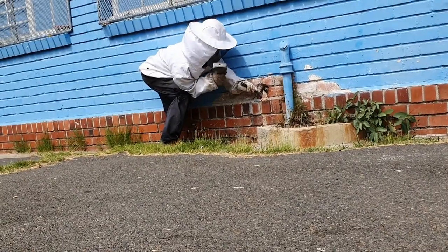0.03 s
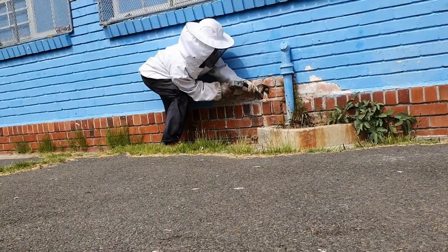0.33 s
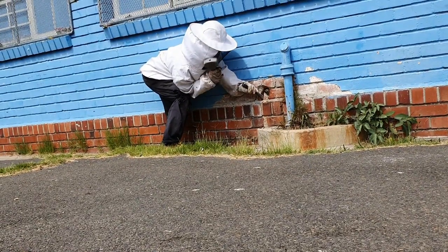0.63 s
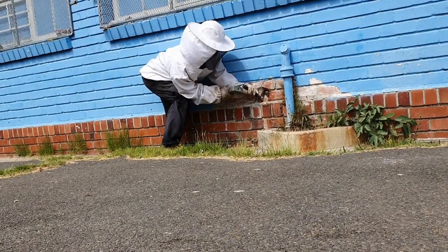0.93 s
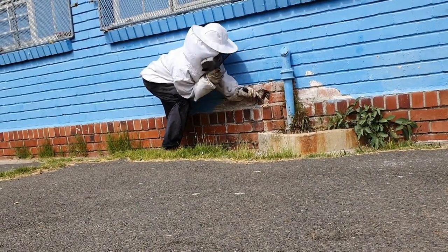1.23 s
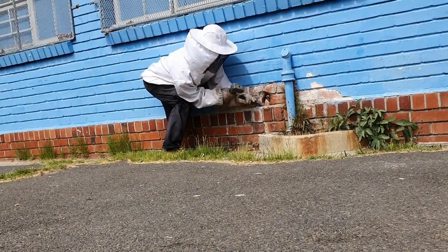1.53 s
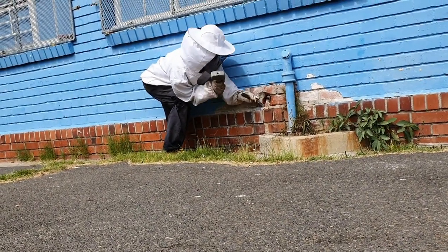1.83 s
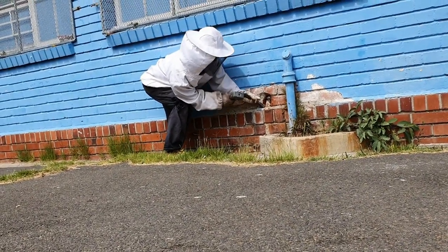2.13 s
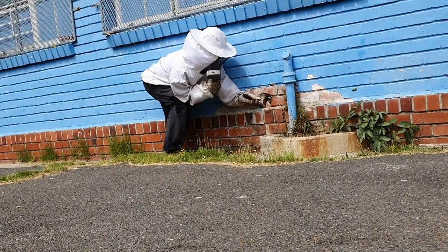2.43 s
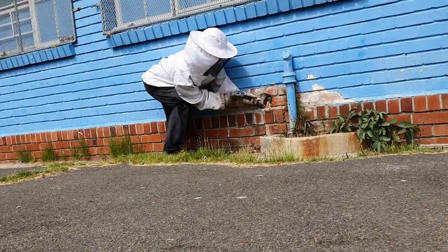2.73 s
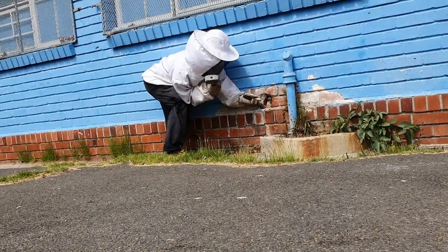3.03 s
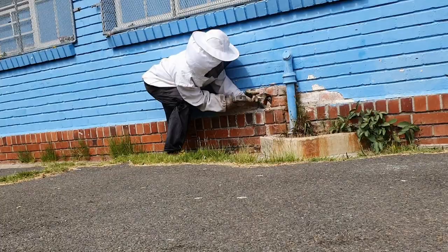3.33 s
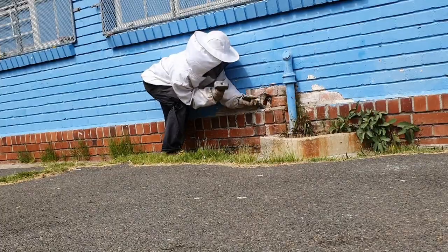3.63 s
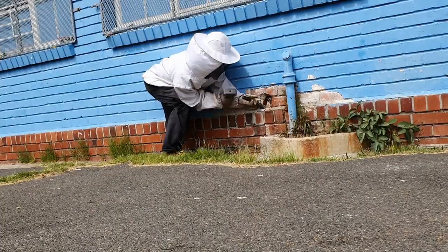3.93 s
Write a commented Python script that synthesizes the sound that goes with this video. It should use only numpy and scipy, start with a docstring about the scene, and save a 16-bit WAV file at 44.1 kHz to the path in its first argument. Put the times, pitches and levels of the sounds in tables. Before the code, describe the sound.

Chiselling on a brick wall outdoors: six sharp, clinking hammer blows echo faintly off far walls, with small ticks and falling grit between them. Wind rumbles on the microphone, growing later, over faint town air.

```python
"""Chiselling a brick wall

A club hammer drives a steel chisel into brick six times, a few metres away across a paved yard.
Each blow cracks, steel and brick ring briefly and far walls echo; the brick rings most on the third.
Between blows mortar crumbles and the chisel ticks as it is set back. Faint town air lies behind.
Wind buffets the microphone, harder towards the end."""
import sys
import numpy as np
from scipy import signal
from scipy.fft import rfft, irfft
from scipy.io import wavfile
from scipy.ndimage import uniform_filter1d

SR = 44100
rng = np.random.default_rng(int(sys.argv[2]) if len(sys.argv) > 2 else 0)


def store_wav(level_fs):
    """Save 16-bit WAV to argv[1]."""
    pcm = np.round(np.clip(np.atleast_2d(level_fs), -1, 1) * 32767)
    wavfile.write(sys.argv[1], SR, pcm.T.astype(np.int16))


N = 176400

# wind at the microphone: t/s, rumble/dB, buffeting/dB
WIND_LEVELS = [(0, -42, -53), (.3, -42, -63.5), (.55, -47, -56.5), (.85, -49.5, -56), (1.02, -39, -54.5),
               (1.2, -48.5, -67), (1.6, -50.5, -48), (1.8, -52, -60), (1.97, -47, -64), (2.16, -35, -39.5),
               (2.34, -48, -60.5), (2.62, -43, -56), (2.85, -41.5, -40.5), (2.99, -45.5, -38),
               (3.269, -43.5, -34.5), (3.542, -45.5, -28.5), (3.74, -46.5, -42.5), (4, -40, -35)]
# rumble balance, left up and right down: t/s, gain/dB
RUMBLE_BALANCE = [(0, -1), (1.1, 3.5), (2.1, 7), (2.7, 2), (3.2, 13.5), (4, 7)]
# spectra of wind, town air, mortar grains and ticks: f/Hz, level/dB
RUMBLE_SPECTRUM = [(10, -18), (28, -21), (58, 3), (100, 2.5), (160, -4.5), (300, -15.5), (700, -51.5),
                   (2000, -67.5)]
BUFFET_SPECTRUM = [(30, -24.5), (120, -8.5), (330, -0.5), (480, -5), (700, -16.5), (1200, -27.5),
                   (2000, -42), (6000, -59)]
AIR_SPECTRUM = [(30, 6), (100, 10), (250, 2), (500, -16.5), (800, 0.5), (1300, -9.5), (2500, -7.5),
                (4200, -10), (6000, -17.5), (8000, -26), (11000, -25.5), (13000, -31), (16000, -41)]
GRIT_SPECTRUM = [(1000, 3.5), (3500, -4), (4600, 6.5), (7000, -6), (10500, 1), (13000, -7), (16000, -0.5)]
TICK_SPECTRUM = [(100, -22), (800, 4), (2000, -8), (4000, -9), (7000, -19), (10500, -25), (12500, -27),
                 (15500, -6.5)]
# single eddies: t/s, length/s, level/dB, centre f/Hz
WIND_EDDIES = [(2.14, .06, -34, 107), (2.89, 0.027, -37, 115), (3.062, 0.029, -32.5, 353),
               (3.104, 0.0079, -26, 426), (3.588, 0.027, -27, 97), (3.858, 0.031, -27, 330)]
# crumbling mortar: t/s, length/s, level/dB
MORTAR_CRUMBLES = [(0.109, 0.27, -51), (0.729, 0.082, -53.5), (1.362, 0.32, -57)]
# chisel set back, grit falling: t/s, level/dB, decay/s, ring/dB
CHISEL_TICKS = [(0.2653, -20.5, 0.0017, -52), (1.4528, -13, 0.015, -43), (1.467, -17, 0.0092, -42),
                (1.494, -14, 0.06, -44), (1.928, -39, .01, -54.5), (2.654, -20.5, 0.00092, -67),
                (3.589, -18, 0.017, -44.5)]
# blows: t/s, hit gain/dB; tone: thud/dB, body/dB, bite/dB, sizzle/dB;
# gains: brick/dB, wedged chisel/dB, loose chisel/dB, scatter/dB; low, high clink: f/Hz, gain/dB each
HAMMER_BLOWS = [(0.3821, 0.5, -9, -3, 1.5, -1.5, -17.5, 10, -1, 1, 1910, 2.5, 5400, 9),
                (0.945, 4, -2, -0.5, -1, 2, 0.5, 10.5, -14, -3.5, 775, -6, 3710, -15),
                (1.5472, -2.5, -8, -10, -14, -17, 10.5, -7.5, 2.5, 3, 1596, 6, 3380, -3),
                (2.2012, -4.5, -6.5, 2.5, 4, -0.5, -9, -0.5, 5.5, 0.5, 1614, 2.5, 5850, 10.5),
                (2.8289, -2, 2.5, 4.5, 5.5, 3, -10, -4, -26, 0, 990, -28, 3510, 1),
                (3.426, 2.5, -1, 1.5, -2, -5.5, -17, -4, 5, -1.5, 1405, 1.5, 3830, -0.5)]
# modes of the brick and of the chisel, wedged and loose: f/Hz, level/dB, T60/s
BRICK_MODES = [(1408, -2, .1), (1578, 1, .11), (2160, -17, .09), (2299, -18, .11)]
WEDGED_MODES = [(3610, -19, 0.02), (3473, -6.5, 0.067), (3700, -5.5, 0.089), (4083, 5, 0.048),
                (5960, -2, 0.055), (6180, -16, .07), (12830, 0, .045), (13370, -8, 0.031)]
LOOSE_MODES = [(5760, 0.5, .08), (5796, -4.5, 0.1), (7760, -8, .06), (9880, -10.5, .07), (10480, -13, .1)]
# spectra of crack, near scatter, yard tail and echoes: f/Hz, level/dB
CRACK_SPECTRUM = [(60, -16), (200, -12.5), (480, -9), (760, 3), (1350, -2), (2050, -6.5), (2450, -1.5),
                  (2900, -7), (3600, 0), (4700, -1), (5550, -1.5), (6300, -3), (7250, -28.5), (8400, -9),
                  (9400, -19), (10500, -15), (11500, -19.5), (12300, -11.5), (13300, -33), (16000, -42.5)]
SCATTER_SPECTRUM = [(60, -4), (170, 5.5), (260, -4), (370, 4.5), (550, 0.5), (850, -0.5), (1400, -4),
                    (2000, -4), (3000, -6.5), (3900, -6.5), (4800, -12), (6000, -8.5), (7200, -18),
                    (8300, -17.5), (9500, -20.5), (11400, -21), (12400, -4), (13300, -33.5), (16000, -35.5)]
YARD_SPECTRUM = [(100, 0), (800, 3.5), (2500, 0.5), (6000, -6), (12000, -0.5)]
ECHO_SPECTRUM = [(100, -10), (1000, -12), (2800, -5), (3850, 4), (4800, -7), (6000, -0.5), (7500, -2.5),
                 (13000, 2.5)]
# decay of near scatter and yard tail: f/Hz, T60/s
SCATTER_DECAY = [(100, 0.32), (500, 0.12), (1500, 0.11), (5000, 0.13), (13000, 0.13)]
YARD_DECAY = [(100, 1.3), (1000, 1.81), (4000, 1.26), (7000, 1.5), (13000, 0.83)]
# far walls: delay/s, level/dB, smear/s
WALL_ECHOES = [(.1358, -28, .003), (.157, -33, .009), (.277, -40, .004)]
# left-right likeness of far sound and near scatter: f/Hz, correlation
FAR_COHERENCE = [(50, .5), (500, .55), (1200, 0), (3500, 0), (16000, 0.4)]
NEAR_COHERENCE = [(50, 0.74), (500, 1), (1000, 0.76), (3000, -0.1), (6000, 0.072), (10000, -.3)]
# direct sound, left against right: f/Hz, phase lead/rad
LEFT_PHASE = [(20, -1.5), (400, -1.65), (1500, 0.85), (3600, 0.49), (4500, -2.07), (7000, -2), (11000, -2),
              (16000, -3.5)]
# overall response, tilting down and falling off above 13 kHz: f/Hz, gain/dB
TREBLE_ROLLOFF = [(20, 3.5), (12600, -4), (13600, -4.5), (16000, -9.5)]

CRACK_RISE_S, CRACK_HOLD_S, CRACK_FALL_S = .001, .0027, .0019
CRACK_DB, SCATTER_DB = 13.5, 9
BRICK_DB, WEDGED_DB, LOOSE_DB, CLINK_DB = -23, -27, -30, -9
CLINK_T60_S, SCATTER_RISE_S = .018, .0025
THUD_HZ, BODY_HZ, MIDDLE_HZ, BITE_HZ, SIZZLE_HZ = 302, 820, 2760, 5600, 9500
AIR_DB, YARD_DB, RING_TO_YARD_DB = -53, -22.5, -14


def amp(db):
    """Decibels to gain."""
    return 10 ** (np.asarray(db) / 20)


def curve_at(points, hz):
    """Interpolation over log frequency."""
    f, value = np.transpose(points)
    return np.interp(np.log(hz + 1), np.log(f + 1), value)


def unit_energy(x):
    """Mean energy per channel of one."""
    return x / np.sqrt(np.mean(x ** 2) * x.shape[-1] + 1e-30)


def unit_rms(x):
    """RMS of one."""
    return x / np.sqrt(np.mean(x ** 2) + 1e-30)


def add(mix, start_s, sound):
    """Mixes a sound in, in place."""
    part = mix[:, max(round(start_s * SR), 0):][:, :sound.shape[-1]]
    part += sound[..., :part.shape[-1]]


def colour(x, spectrum, size=4096):
    """Minimum-phase filter from a curve of f/Hz, gain/dB."""
    log_gain = np.log(amp(curve_at(spectrum, abs(np.fft.fftfreq(size, 1 / SR)))))
    taps = np.fft.ifft(np.exp(np.conj(signal.hilbert(log_gain)))).real[:size // 2]
    return signal.fftconvolve(np.atleast_2d(x), taps[None], axes=1)[:, :x.shape[-1]]


def diffuse(n, coherence=FAR_COHERENCE):
    """White noise from all sides, partly alike left and right."""
    a, b = rfft(rng.standard_normal((2, n)))
    same = np.clip(curve_at(coherence, np.fft.rfftfreq(n, 1 / SR)), -.98, .98)
    mid, side = a * np.sqrt((1 + same) / 2), b * np.sqrt((1 - same) / 2)
    return irfft([mid + side, mid - side], n)


def from_wall(x):
    """Direct sound reaches the two microphone ports out of phase."""
    z = rfft(np.ravel(x), 2 * x.size)
    lead = np.exp(1j * curve_at(LEFT_PHASE, np.fft.rfftfreq(2 * x.size, 1 / SR)))
    return irfft([z * lead, z])[:, :x.size]


def turbulence(spectrum, left_db, lump_db, lump_s):
    """Independent pressure noise at each port, swelling in shared lumps."""
    lumps = unit_rms(signal.fftconvolve(rng.standard_normal(N), np.hanning(int(2 * lump_s * SR)), "same"))
    ports = colour(rng.standard_normal((2, N)), spectrum)
    return unit_rms(ports * amp(lump_db * lumps)) * amp(np.array([[1], [-1]]) * left_db)


def wind(eddy_width_oct=.53):
    """Air over the microphone: rumble, higher buffeting in gusts, single eddies."""
    times_s, rumble_db, buffet_db = np.transpose(WIND_LEVELS)
    t = np.arange(N) / SR
    left_db = np.interp(t, *np.transpose(RUMBLE_BALANCE))
    rumble = turbulence(RUMBLE_SPECTRUM, left_db, lump_db=2.3, lump_s=.03)
    buffet = turbulence(BUFFET_SPECTRUM, left_db=-.5, lump_db=2.4, lump_s=.012)
    out = rumble * amp(np.interp(t, times_s, rumble_db)) + buffet * amp(np.interp(t, times_s, buffet_db))
    hz = np.fft.rfftfreq(SR, 1 / SR)
    for start_s, length_s, db, centre_hz in WIND_EDDIES:
        band = np.exp(-.5 * (np.log2((hz + 1) / centre_hz) / eddy_width_oct) ** 2)
        n = int(length_s * SR)
        eddy = irfft(rfft(rng.standard_normal((2, SR))) * band)[:, :n] * np.hanning(n) ** .5
        add(out, start_s, amp(db) * unit_rms(eddy))
    return out


def town_air():
    """Steady, diffuse noise of a distant town."""
    return amp(AIR_DB) * unit_rms(colour(diffuse(N), AIR_SPECTRUM))


def crumble(length_s, db, spread_db=4):
    """A swell of tiny mortar grains."""
    n = int(length_s * SR)
    grains = rng.standard_normal(n) * amp(spread_db * np.minimum(rng.exponential(1, n), 6))
    return amp(db) * from_wall(unit_rms(colour(grains, GRIT_SPECTRUM)) * np.hanning(n) ** .5)


def ring(modes, t):
    """Damped modes of alternating sign, set off by one touch."""
    return sum(amp(db - 60 * t / t60_s) * np.sin(2 * np.pi * hz * t) * (-1) ** k
               for k, (hz, db, t60_s) in enumerate(modes))


def tick(db, decay_s, ring_db):
    """Steel or grit touches brick; the loose chisel rings faintly."""
    t = np.arange(SR // 5) / SR
    touch = unit_energy(colour(rng.standard_normal(len(t)) * np.exp(-t / decay_s), TICK_SPECTRUM))
    return from_wall(amp(db) * touch + amp(ring_db) * ring(LOOSE_MODES, t))


def crack(t, passes=3):
    """Brick crushed under the edge: a broadband burst of a few milliseconds."""
    envelope = np.minimum(t / CRACK_RISE_S, 1) * np.exp(-np.maximum(t - CRACK_HOLD_S, 0) / CRACK_FALL_S)
    burst = rng.standard_normal(len(t)) * envelope
    for _ in range(passes):  # flatten the spectrum, keep the burst short
        z = rfft(burst)
        burst = irfft(z / np.sqrt(abs(z) + 1e-9), len(t)) * envelope ** (1 / passes)
    return unit_energy(colour(burst, CRACK_SPECTRUM))


def tail(n, decay, coherence, patchy_db=2, size=256):
    """Dense reflections: patchy diffuse noise, each band dying at its own rate."""
    hz, t, z = signal.stft(diffuse(n, coherence), SR, nperseg=size)
    patches = uniform_filter1d(rng.standard_normal(z.shape[1:]), size=3, axis=0)
    patches = unit_rms(uniform_filter1d(patches, size=6, axis=1))
    gain = amp(patchy_db * patches) * np.exp(-np.log(1000) * t / curve_at(decay, hz)[:, None])
    return signal.istft(z * gain, SR, nperseg=size)[1][:, :n]


def scatter(t):
    """Near reflections off wall and ground."""
    reflections = tail(len(t), SCATTER_DECAY, NEAR_COHERENCE) * (1 - np.exp(-t / SCATTER_RISE_S))
    return unit_energy(colour(reflections, SCATTER_SPECTRUM))


def blow(hit_db, thud_db, body_db, bite_db, sizzle_db, brick_db, wedged_db, loose_db, scatter_db,
         low_hz, low_db, high_hz, high_db):
    """Hammer on chisel. Returns the hit (crack, scatter) and the ringing of brick and steel."""
    t = np.arange(SR // 3) / SR
    rings = amp(BRICK_DB + brick_db) * ring(BRICK_MODES, t)
    rings += amp(WEDGED_DB + wedged_db) * ring(WEDGED_MODES, t)
    rings += amp(LOOSE_DB + loose_db) * ring(LOOSE_MODES, t)
    # the brick under the edge clinks differently at every blow
    rings += amp(CLINK_DB) * ring([(low_hz, low_db, CLINK_T60_S), (high_hz, high_db, CLINK_T60_S)], t)
    hit = amp(SCATTER_DB + scatter_db) * scatter(t) + amp(CRACK_DB) * from_wall(crack(t))
    tone = [(THUD_HZ, thud_db), (BODY_HZ, body_db), (MIDDLE_HZ, 0),
            (BITE_HZ, bite_db), (SIZZLE_HZ, sizzle_db)]
    return amp(hit_db) * colour(hit, tone), from_wall(rings * np.minimum(t / CRACK_RISE_S, 1))


def yard(x, rise_s=.0052):
    """A faint long tail and smeared echoes off far walls."""
    t = np.arange(SR) / SR
    reverb = tail(SR, YARD_DECAY, FAR_COHERENCE, patchy_db=6) * np.minimum(t / rise_s, 1)
    response = amp(YARD_DB) * unit_energy(colour(reverb, YARD_SPECTRUM))
    for delay_s, db, smear_s in WALL_ECHOES:
        echo = colour(diffuse(SR) * np.exp(-t / smear_s), ECHO_SPECTRUM)
        add(response, delay_s, amp(db) * unit_energy(echo))
    return signal.fftconvolve(x, response, axes=1)


def scene():
    """Chiselling in the yard, over wind and town air."""
    mix = wind() + town_air()
    for start_s, *row in HAMMER_BLOWS:
        hit, rings = blow(*row)
        add(mix, start_s, hit + rings)
        add(mix, start_s, yard(hit + amp(RING_TO_YARD_DB) * rings))
    for start_s, *row in CHISEL_TICKS:
        add(mix, start_s, tick(*row))
    for start_s, *row in MORTAR_CRUMBLES:
        add(mix, start_s, crumble(*row))
    return mix


def record(dry):
    """Clipping at full scale, treble loss, 16 kHz band limit."""
    dulled = colour(np.clip(dry, -1, 1), TREBLE_ROLLOFF)
    lowpass = signal.firwin(511, 16000, window=("kaiser", 9), fs=SR)
    return signal.oaconvolve(dulled, lowpass[None], "same")


dry = scene()
out = record(dry)
store_wav(out)
```